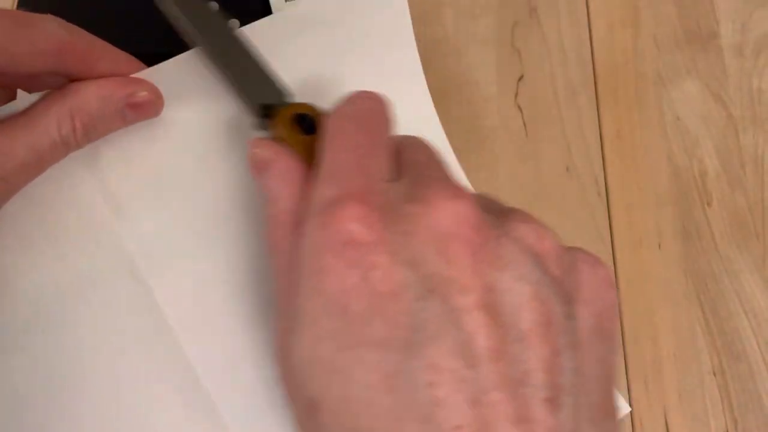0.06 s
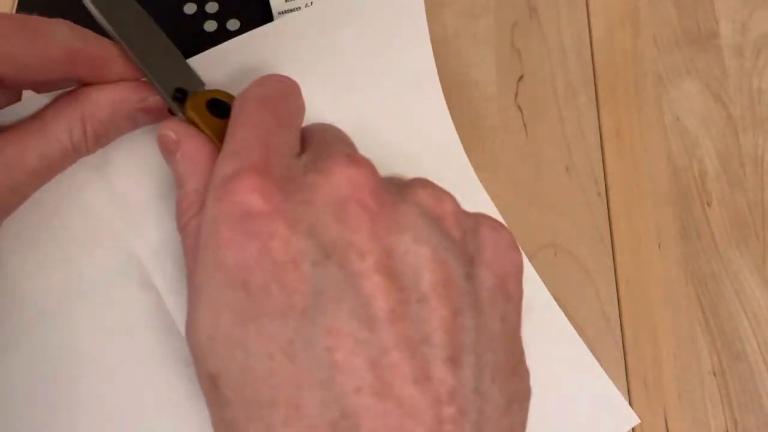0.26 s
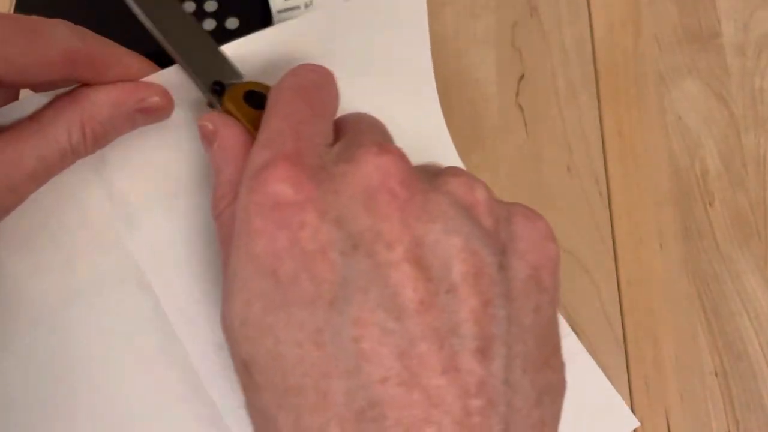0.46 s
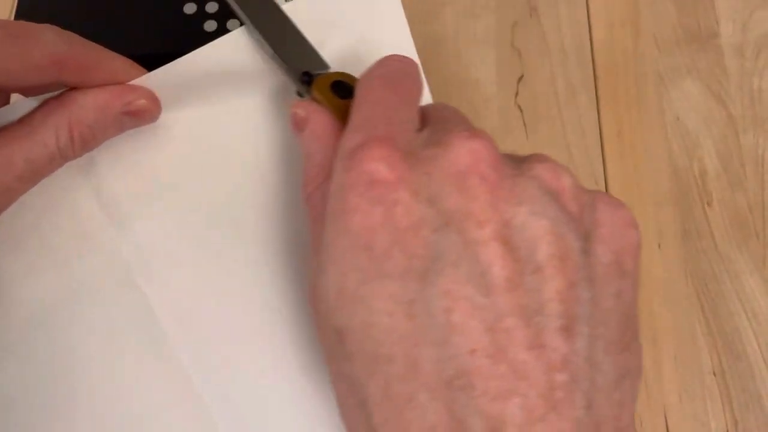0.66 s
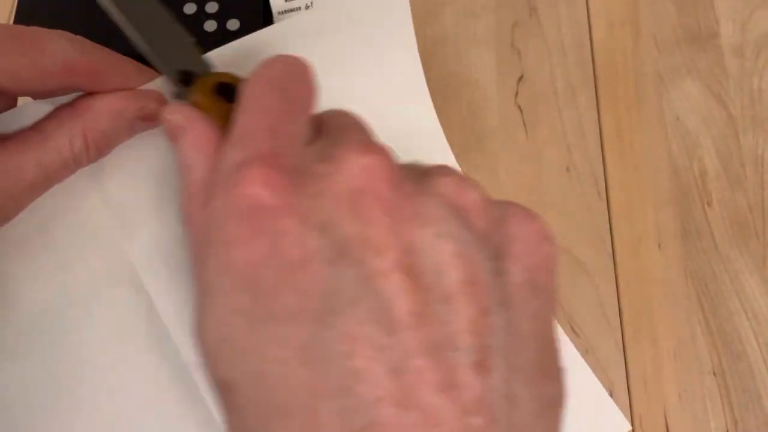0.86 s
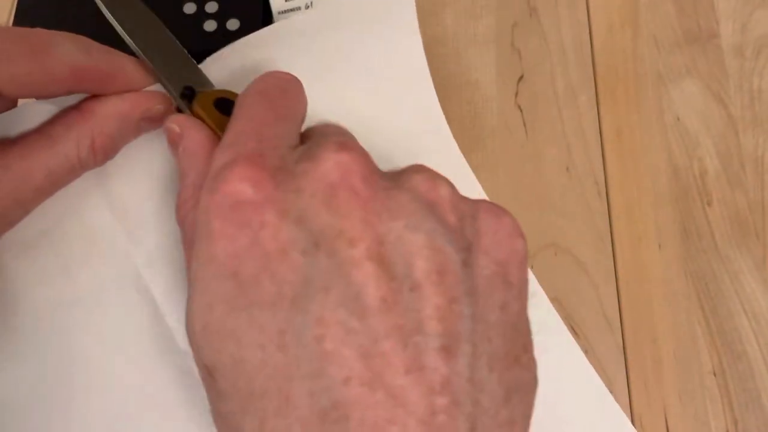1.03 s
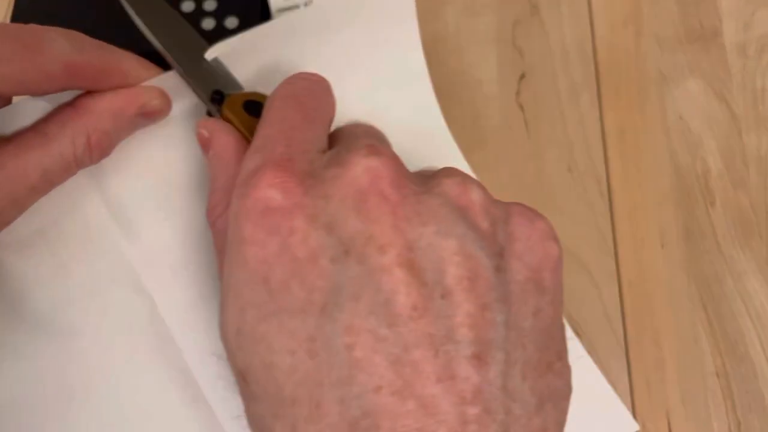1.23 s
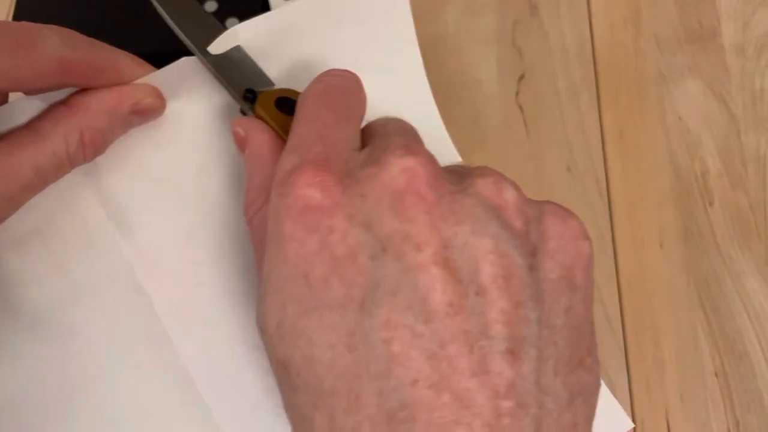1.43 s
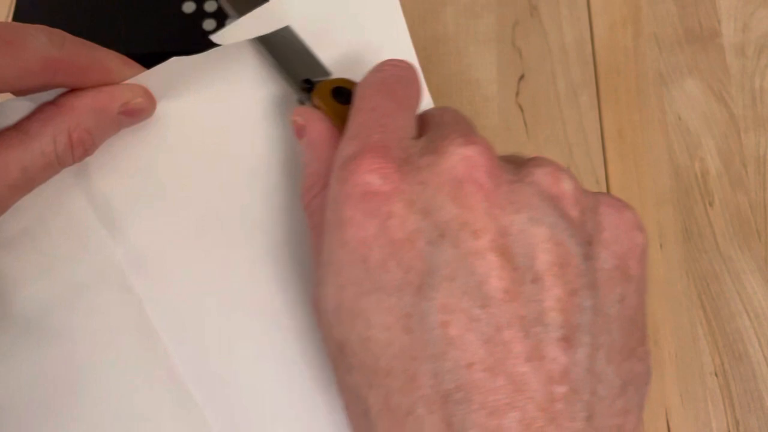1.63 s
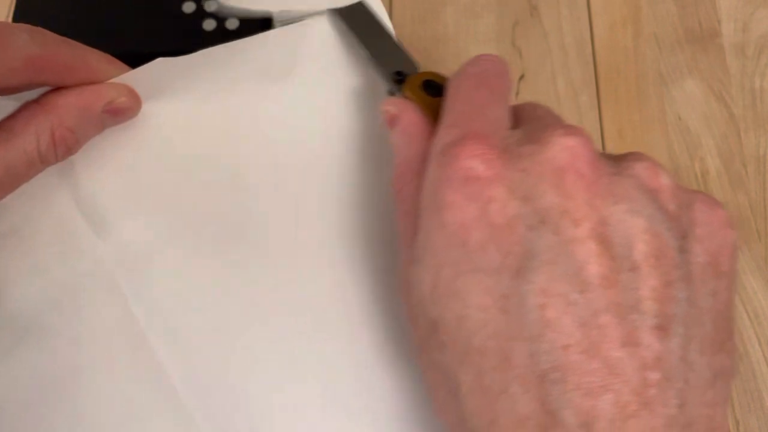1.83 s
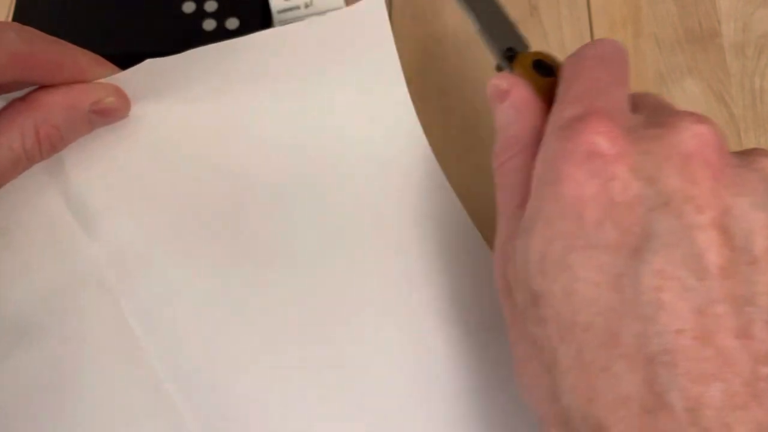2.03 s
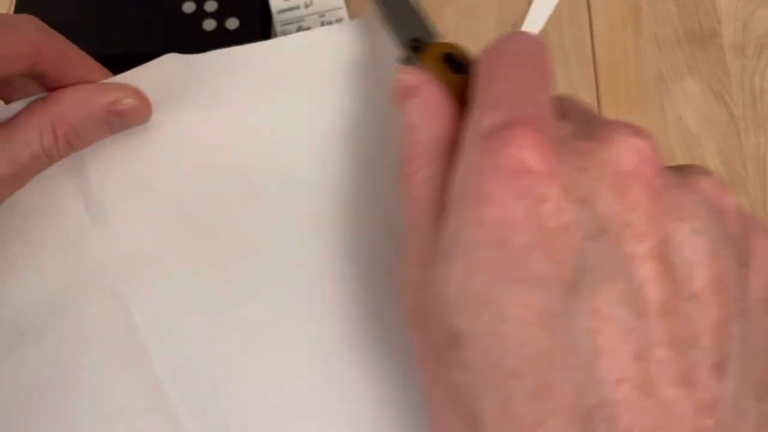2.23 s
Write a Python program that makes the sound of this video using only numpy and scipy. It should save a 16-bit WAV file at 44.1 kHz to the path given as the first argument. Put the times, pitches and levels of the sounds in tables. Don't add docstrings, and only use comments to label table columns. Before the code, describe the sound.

A knife blade rasps through a sheet of paper in two slices, ending in sharp snaps.

```python
import sys
import numpy as np
from scipy import signal
from scipy.fft import rfft, irfft, next_fast_len
from scipy.io import wavfile
from scipy.ndimage import uniform_filter1d, map_coordinates

SR = 44100
rng = np.random.default_rng(int(sys.argv[2]) if len(sys.argv) > 2 else 0)


def unload_wav(signal):
    wavfile.write(
        sys.argv[1],
        SR,
        np.round(np.clip(np.atleast_2d(signal).T, -1, 1) * 32767).astype(np.int16),
    )


def nominal_scale(level):
    x = np.asarray(level, float) / 20
    return 10 ** x


N = 100724
T = np.arange(N) / SR


def unit(x):
    return x / np.sqrt(np.mean(x ** 2) + 1e-20)


def along(points, hz):
    f, v = np.transpose(points)
    return np.interp(np.log(hz + 1), np.log(f + 1), v)


def wobble(rate):
    return map_coordinates(rng.standard_normal(int(N * 400 / SR) + 4), [T * min(rate, 400)])


def filtered(x, response):
    n = x.shape[-1]
    m = next_fast_len(n + 8192)
    return irfft(rfft(x, m) * response(np.fft.rfftfreq(m, 1 / SR)), m)[..., :n]


def causal(points):
    def response(hz):
        c = irfft(np.log(nominal_scale(along(points, hz))))
        c[1:len(c) // 2] *= 2
        c[len(c) // 2 + 1:] = 0
        return np.exp(rfft(c))
    return response


def peak(f, hz, width):
    return 1j * f * width / (hz * hz - f * f + 1j * f * width + 1e-9)


def fibres(n, rate, spread_db):
    hit = rng.random(n)
    size = rng.exponential(size=n)
    sign = rng.standard_normal(n)
    snapped = np.clip((rate / SR - hit) * 50, 0, 1)
    return unit(sign * nominal_scale(spread_db * np.minimum(size, 4)) * snapped)


def patchy(x, depth_db):
    z = signal.stft(x, nperseg=256)[2]
    field = uniform_filter1d(rng.standard_normal(z.shape), 4, 0)
    field = uniform_filter1d(field, 12, 1)
    return signal.istft(z * nominal_scale(depth_db * unit(field)), nperseg=256)[1][:N]


def diffuse_noise():
    common, difference = rng.standard_normal((2, N))
    return np.array([common + .3 * difference, common - .3 * difference])


def room_hum():
    # f/Hz, level/dB
    hum_spectrum = [(13, 3), (22, -8), (54, 5.5), (292, -25.5), (354, -4.5), (400, -72), (520, -57),
                    (880, -120)]
    level_db = -66
    return nominal_scale(level_db) * unit(filtered(diffuse_noise(), causal(hum_spectrum + [(1000, -120)])))


def flaps():
    # t/s, level/dB, length/s, f/Hz
    sways = [(0.01, -47.5, 0.051, 62), (0.092, -60.5, 0.06, 45.6), (0.314, -54.5, 0.038, 87),
             (0.4, -54.5, 0.12, 80), (0.518, -50.5, 0.068, 88), (0.674, -53.5, 0.031, 88),
             (0.754, -56, 0.055, 62), (1.055, -46.5, 0.035, 73.6), (1.131, -53, 0.12, 107),
             (1.49, -53, 0.064, 68.5), (1.596, -55, 0.045, 60), (1.737, -75, .06, 73.5),
             (1.861, -41.5, 0.016, 227), (1.896, -42.5, 0.012, 170), (1.919, -46.5, 0.013, 110),
             (1.965, -42, 0.0063, 89), (1.985, -47.5, 0.019, 84), (2.261, -67, 0.028, 60.4)]
    # f/Hz, level/dB
    push_spectrum = [(30, -20.5), (100, -6), (250, -3), (700, -39)]
    push_db = -3.5
    beats, envelope = np.zeros(N), np.zeros(N)
    for s, db, length, hz in sways:
        bell = nominal_scale(db) * np.exp(-((T - s) / length) ** 2 * 2)
        beats += bell * np.sqrt(2) * np.sin(2 * np.pi * hz * (T - s))
        envelope += bell
    push = unit(filtered(diffuse_noise(), causal(push_spectrum)))
    return beats * nominal_scale([[-.4], [.4]]) + nominal_scale(push_db) * envelope * push


def slide():
    # t/s, level/dB, ring level of the lifted sheet/dB
    strokes = [(0, -61, 16), (0.071, -54.5, -2), (.17, -58, 3), (0.249, -62, 5), (.265, -88, 4),
               (0.284, -69, 12), (0.291, -45.5, -1), (.72, -51, -3), (.82, -59.5, 5.5), (.95, -60, 2.5),
               (.995, -72.5, 8), (1.018, -82, 5), (1.028, -50, 2), (1.92, -45.5, 6), (2.101, -62, 2),
               (2.15, -50, -0.5), (2.271, -49, 2.5), (2.284, -63, 6)]
    # f/Hz, level/dB
    rub_spectrum = [(120, 1), (300, -5.5), (800, 3.5), (1700, 2), (3500, -2.5), (7000, -4), (11000, -11.5),
                    (15500, -10)]
    lifted_hz, lifted_width_hz = 1400, 1900
    s, level_db, ring_db = np.transpose(strokes)
    rub = unit(patchy(filtered(fibres(N, 15000, spread_db=2.0), causal(rub_spectrum)), depth_db=-0.5))
    ring = filtered(rub, lambda f: peak(f, lifted_hz, lifted_width_hz) ** 2)
    level = nominal_scale(np.interp(T, s, level_db) + 0.19 * wobble(48))
    return level * (rub + (nominal_scale(np.interp(T, s, ring_db)) - 1) * ring)


def catches():
    # t/s, length/s, level/dB, ring f/Hz, brightness/dB
    releases = [(0.0, 0.0054, -38.5, 840, -2), (0.027, 0.0014, -41.5, 1230, -34),
                (0.034, 0.0034, -22, 1843, -11.5), (0.2868, 0.0046, -37.5, 700, -5),
                (0.307, 0.0051, -51, 800, -26), (0.317, 0.0077, -42.5, 2000, -4),
                (.326, 0.0025, -39.5, 820, -7), (0.351, 0.005, -42, 1540, -3),
                (0.3618, 0.0028, -30.5, 1660, -30), (0.3822, 0.011, -36, 1210, -3.5),
                (0.393, 0.013, -38, 2630, 3), (0.427, 0.0046, -45, 900, -9), (0.395, 0.012, -33, 1520, -8),
                (0.606, 0.0087, -33.5, 890, -0.5), (0.7176, 0.00057, -23, 1660, -20),
                (0.7187, 0.0013, -27.5, 900, -7), (0.7378, 0.0012, -32, 2120, -7),
                (0.739, 0.0047, -33, 1350, -13), (0.744, 0.016, -45, 726, -25.5),
                (1.0233, 0.0033, -32.5, 796, -5.5), (1.061, 0.011, -36, 890, 1),
                (1.089, 0.012, -42.5, 1210, -1.5), (1.145, 0.0058, -38.5, 1520, -0.5),
                (1.292, .004, -31.5, 1410, 2), (1.384, 0.0058, -34, 970, 9),
                (1.557, 0.0012, -29.5, 1560, -1), (1.8524, 0.0013, -28, 1240, 5),
                (1.8565, 0.0019, -20, 1180, -1), (1.868, 0.0044, -27.5, 890, -13),
                (1.89, 0.00074, -28, 1420, 1), (1.8924, 0.001, -20.5, 1680, 2.5),
                (1.8939, 0.0014, -13, 1400, -2.5), (1.945, 0.00097, -27, 1440, 3),
                (1.949, 0.0007, -22, 1720, -7), (2.277, 0.0087, -36, 1870, -30),
                (2.2812, 0.0048, -17.5, 2087, -4)]
    # f/Hz, level/dB
    snap_spectrum = [(120, -26), (350, -2), (600, 0), (1000, -0.5), (2000, -4.5), (4500, -2), (7000, -8.5),
                     (15500, -21)]
    first_snap = 3.76
    decay_t60_s, flutter_t60_s, flutter_db = 0.012, .05, -16
    ring_db, ring_width, below_ring = 12, 0.13, 0.19
    out, t = np.zeros(N + SR), np.arange(SR // 5) / SR
    colour = causal(snap_spectrum)
    impulse = 1. * (t == 0)
    for s, length, db, hz, bright_db in releases:
        after = np.maximum(t - length, 0)
        shape = nominal_scale(-60 * after / decay_t60_s) + nominal_scale(flutter_db - 60 * after / flutter_t60_s)
        strength = first_snap * (1 + 0.0034 / max(length, 5e-4))
        snap = strength * filtered(impulse, lambda f: peak(f, 1.34 * hz, 1.18 * hz))

        def response(f):
            ring = 1 + nominal_scale(ring_db) * peak(f, hz, ring_width * hz)
            low_cut = 1j * f / (below_ring * hz + 1j * f)
            shelf = (1 + 1j * nominal_scale(bright_db) * f / 2500) / (1 + 1j * f / 2500)
            return colour(f) * ring * low_cut * shelf ** 2

        burst = filtered(shape * fibres(len(t), 15600, spread_db=1.5) + snap, response)
        core = burst[:int((length + .002) * SR)]
        out[round(s * SR):][:len(t)] += nominal_scale(db) * burst / np.sqrt(np.mean(core ** 2))
    return out[:N]


def retuned(x, rows):
    spread = 0.11
    hz, t, z = signal.stft(x, SR, nperseg=512)
    columns = np.transpose(rows)
    low_hz, high_hz, low_db, high_db = (np.interp(t, columns[0], c) for c in columns[1:])

    def bump(at, db):
        return nominal_scale(db) / (1 + ((hz[:, None] - at) / (spread * at)) ** 2)

    gain = 1.5 + bump(low_hz, low_db) + bump(high_hz, high_db)
    return signal.istft(z * gain, SR, nperseg=512)[1][:N]


def cut():
    # t/s, force level/dB, brightness/dB, share of the freed strip/1
    slices = [
        [(.424, -38, -28, 0.04), (.434, -32, -11, 0.1), (.52, -27.5, -5.5, 0.7), (.6, -37, 0, 0.6),
         (.676, -38.5, -0.5, 0.47), (.703, -53, -19, 0.2)],
        [(1.142, -30.5, -2, 0.47), (1.214, -32, 2.5, 0.67), (1.376, -35.5, -5.5, 0.44),
         (1.386, -28.5, -4.5, 0.68), (1.55, -26.5, -2.5, 0.66), (1.69, -22.5, -2.5, 0.91),
         (1.78, -24.5, -0.5, 0.71), (1.86, -22, -5.5, 0.64), (1.892, -21.5, 2, 0.8)],
    ]
    # t/s, low ring f/Hz, high ring f/Hz, low ring level/dB, high ring level/dB
    flap_rings = [
        [(0.425, 1000, 3960, -8, 8.5), (0.467, 940, 4000, -12, -12), (0.503, 1230, 3780, -5, 5),
         (0.543, 1120, 4200, -24, -5), (0.569, 1100, 4030, -4, -4), (0.609, 881, 3450, -1, 7),
         (0.637, 845, 3700, 7, 5), (0.675, 1240, 3640, -9, 9), (0.7, 1290, 3800, -7, -16)],
        [(1.145, 1400, 4010, 3, 3.5), (1.273, 1540, 3660, 10, 9.5), (1.439, 1070, 4220, -8, 8),
         (1.485, 1420, 4270, 1, 6), (1.629, 1040, 4570, 3, 6), (1.689, 1830, 4100, 5, -0.5),
         (1.771, 1190, 4300, 1, 1), (1.815, 1270, 2950, 11, 13.5), (1.89, 1180, 3680, 11, -11)],
    ]
    # f/Hz, level/dB
    rasp_spectrum = [(120, -17), (400, -5), (800, 0), (1600, 6), (3000, -5.5), (5500, -2), (8000, 4.5),
                     (11500, -3.5), (14800, -0.5), (15800, -24.5)]
    # f/Hz, width/Hz, level/dB
    sheet_modes = [(810, 42, 9.5), (1350, 41, -10), (2540, 36, -14), (3315, 55, 8), (3850, 100, -5),
                   (4100, 39, -22.5), (4910, 48, 8)]
    # f/Hz, width/Hz, level/dB
    strip_modes = [(826, 22, -4), (2490, 940, -0.5), (2720, 19, -16), (3760, 110, -9.5), (4300, 42, -6),
                   (6000, 55, -36), (7700, 64, -9)]
    modes_db, widen_hz = 6.5, 180
    fibres_per_s, fibre_spread_db = 16000, 1.7

    def body(modes):
        return lambda f: 1 + nominal_scale(modes_db) * sum(nominal_scale(db) * peak(f, hz, w + widen_hz) for hz, w, db in modes)

    grain = filtered(fibres(N, fibres_per_s, fibre_spread_db), causal(rasp_spectrum))
    grain = patchy(grain, depth_db=1.5)
    sheet = unit(filtered(grain, body(sheet_modes)))
    strip = unit(filtered(grain, body(strip_modes)))
    out = np.zeros(N)
    judder = nominal_scale(0.79 * wobble(29.78) + 0.66 * wobble(170))
    for rows, rings in zip(slices, flap_rings):
        s, force_db, bright_db, share = np.transpose(rows)
        share = np.clip(np.interp(T, s, share), 0, 1)
        rasp = unit(retuned((1 - share) * sheet + share * strip, rings))
        low = filtered(rasp, lambda f: 1 / (1 + (f / 2600) ** 4))
        force = nominal_scale(np.interp(T, s, force_db, -120, -120))
        out += force * judder * (low + nominal_scale(np.interp(T, s, bright_db)) * (rasp - low))
    return out


def room(x):
    # f/Hz, t60/s
    decay = [(200, .2), (2000, .13), (10000, .06)]
    # f/Hz, level/dB
    colour = [(150, -8), (500, -9), (1300, -17), (3000, -8), (6000, -9), (9000, -12), (15000, -13)]
    x = filtered(x, causal(colour))
    hz, t, z = signal.stft(rng.standard_normal((2, SR // 3)), SR, nperseg=256)
    tail = signal.istft(z * nominal_scale(-60 * t / along(decay, hz)[:, None]), SR, nperseg=256)[1]
    delayed = np.pad(x, (200, 0))[None]
    return signal.fftconvolve(delayed, tail / np.linalg.norm(tail[0]), axes=1)[:, :N]


def ports(x):
    # f/Hz, phase/rad
    lead = [(2000, 0), (2500, .8), (3300, .7), (3800, .25), (4400, .3), (5700, 1.5), (6600, 2),
            (7300, 2.75), (8000, 3.1), (8900, 2.7), (9600, 1.6), (10400, .8), (11400, 0), (12300, -.6),
            (13000, -1.3), (13800, -2.45), (14600, -3.1), (16000, -3.9)]
    # f/Hz, level/dB
    tilt = [(100, -1), (400, -3), (750, 2), (1100, 0), (4200, -1), (5700, -7), (7000, 0)]
    sway = .04
    half = np.array([[.5], [-.5]])

    def heard(k):
        def response(f):
            phase = half * np.interp(k * f, *np.transpose(lead))
            return nominal_scale(half * along(tilt, f)) * np.exp(-1j * phase)
        return filtered(x, response)

    mix = .5 + .5 * np.tanh(wobble(6))
    return mix * heard(1 + sway) + (1 - mix) * heard(1 - sway)


def scene():
    paper = cut() + catches() + slide()
    return ports(paper) + room(paper) + flaps() + room_hum()


def roll_off(x):
    return signal.sosfilt(signal.butter(12, 15930, fs=SR, output="sos"), x)


def record(dry):
    mix = filtered(dry, lambda f: (1j * f / (29 + 1j * f)) ** 2)
    return roll_off(mix)


dry = scene()
out = record(dry)
unload_wav(out)
```